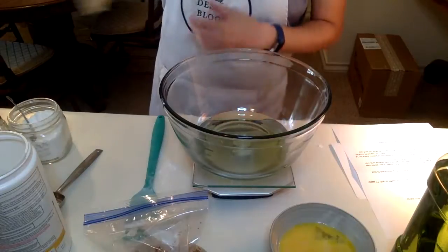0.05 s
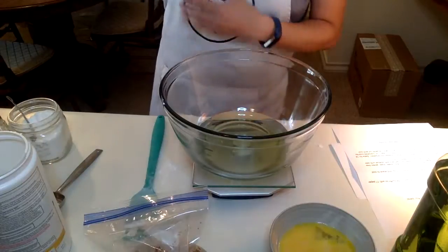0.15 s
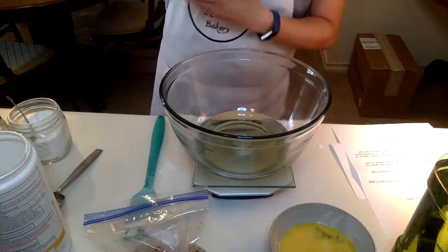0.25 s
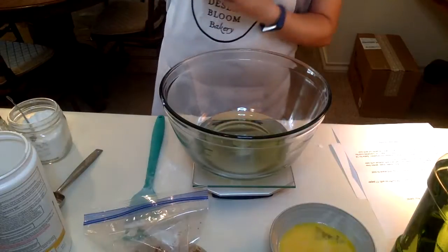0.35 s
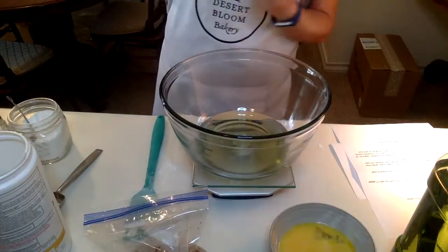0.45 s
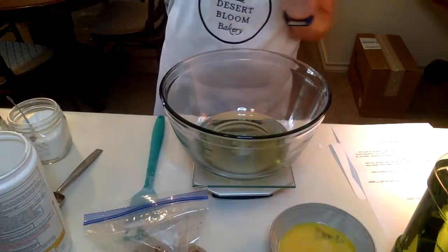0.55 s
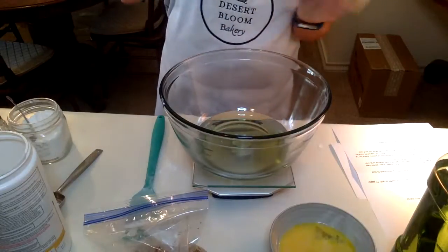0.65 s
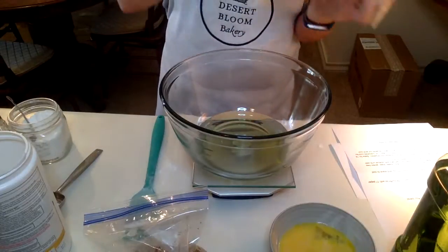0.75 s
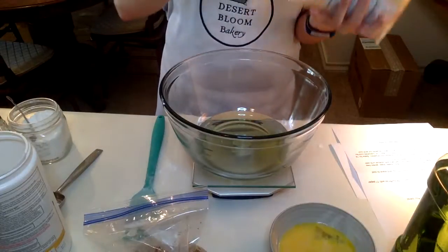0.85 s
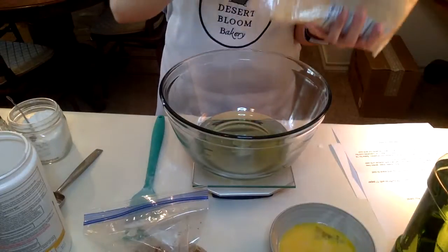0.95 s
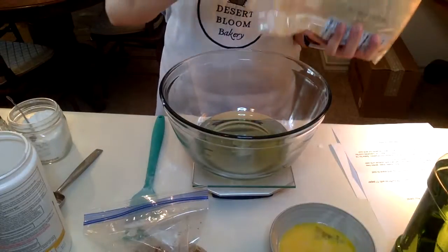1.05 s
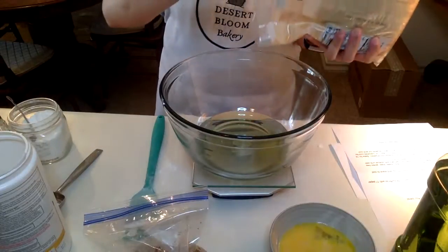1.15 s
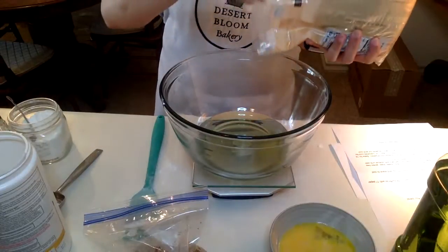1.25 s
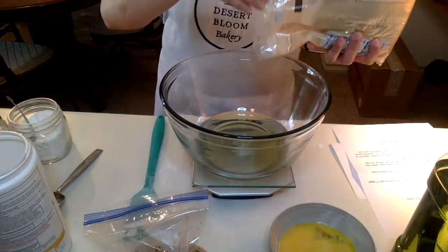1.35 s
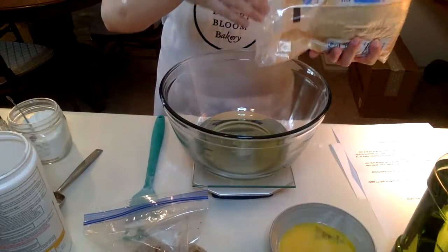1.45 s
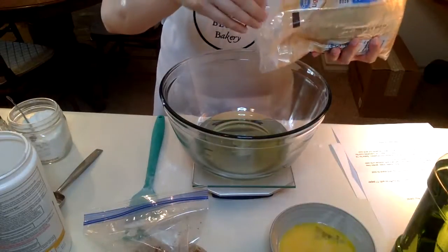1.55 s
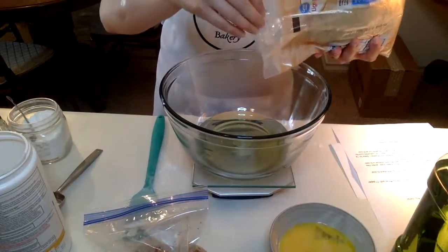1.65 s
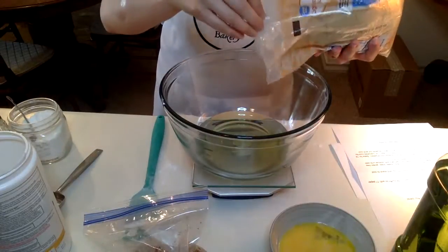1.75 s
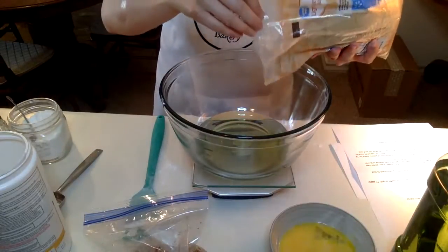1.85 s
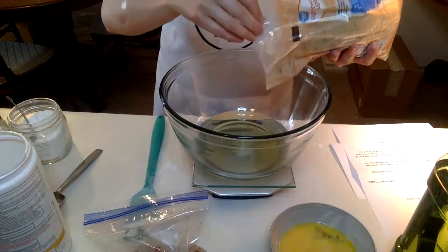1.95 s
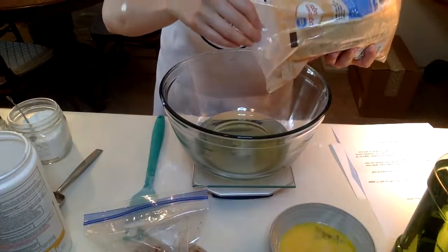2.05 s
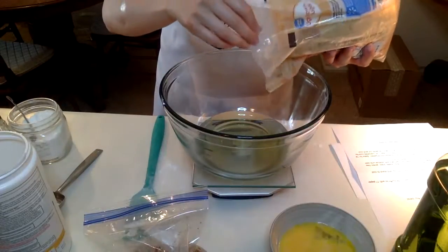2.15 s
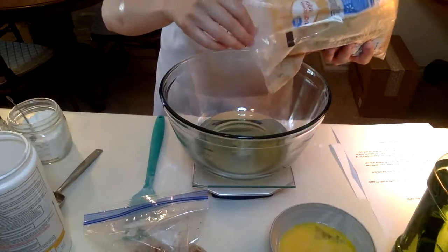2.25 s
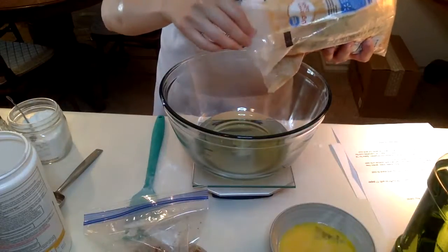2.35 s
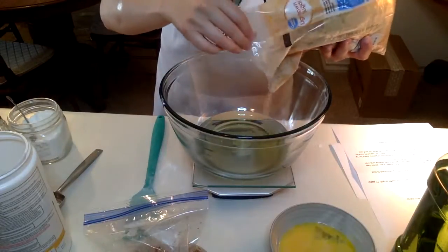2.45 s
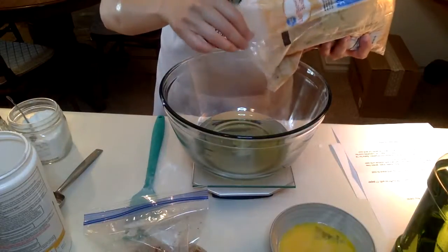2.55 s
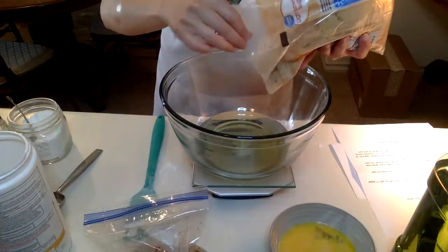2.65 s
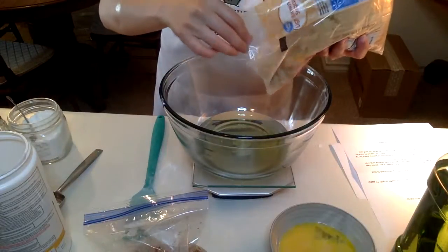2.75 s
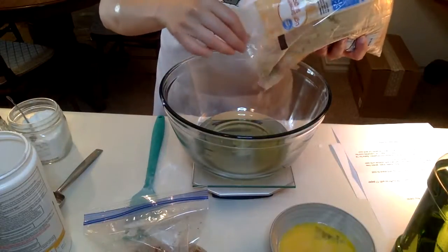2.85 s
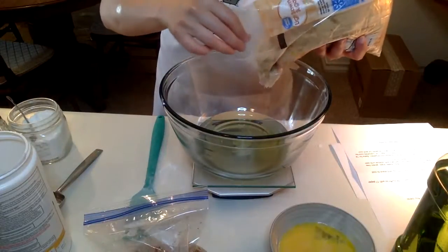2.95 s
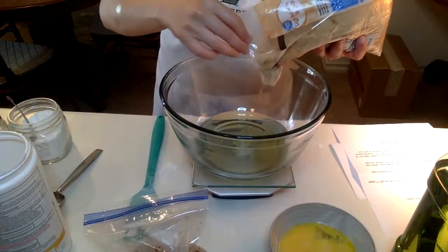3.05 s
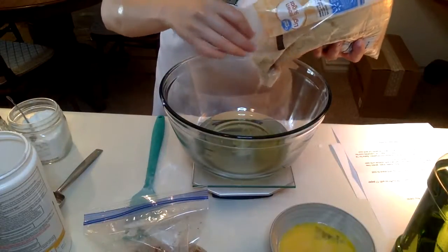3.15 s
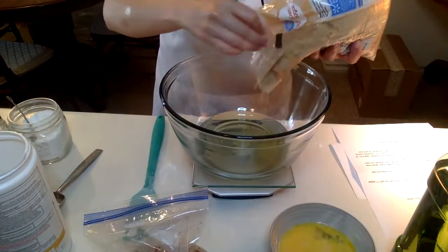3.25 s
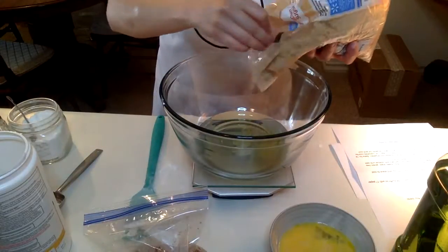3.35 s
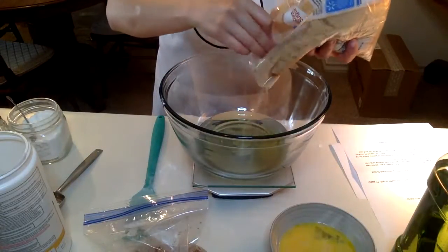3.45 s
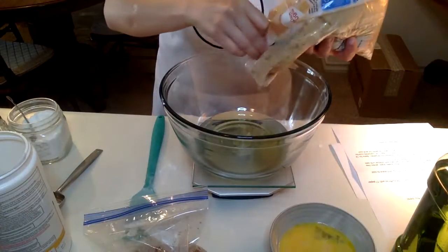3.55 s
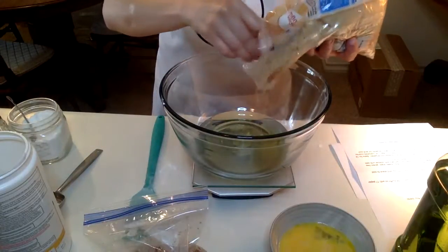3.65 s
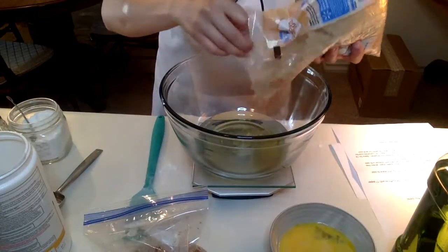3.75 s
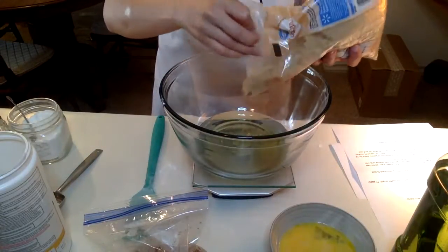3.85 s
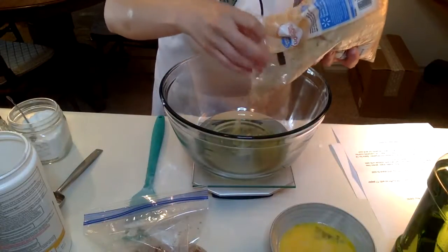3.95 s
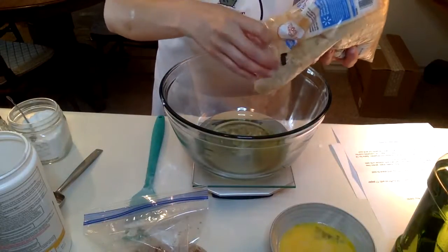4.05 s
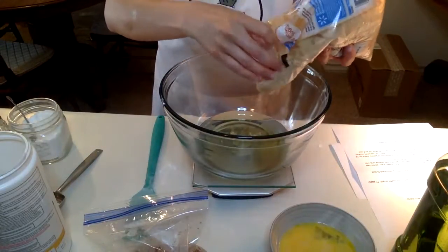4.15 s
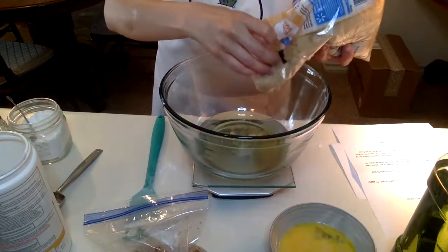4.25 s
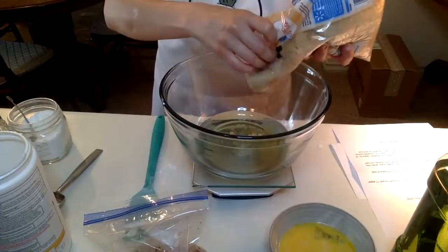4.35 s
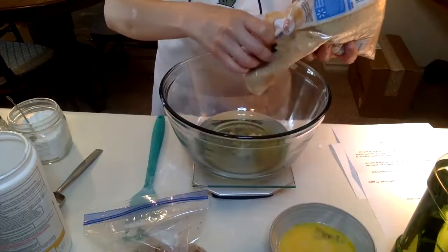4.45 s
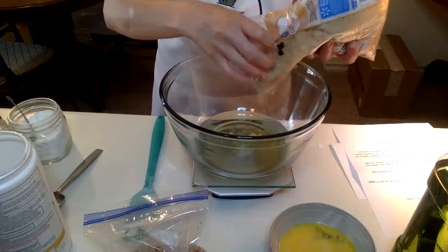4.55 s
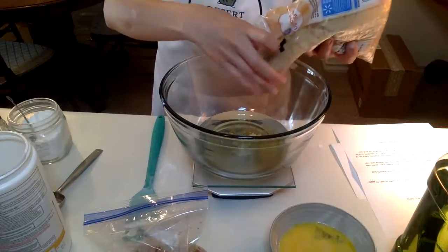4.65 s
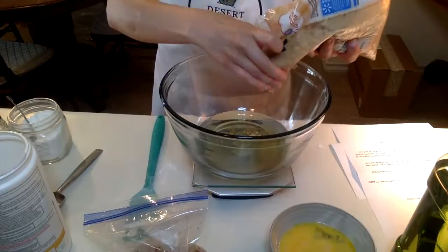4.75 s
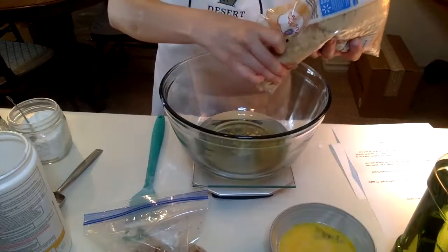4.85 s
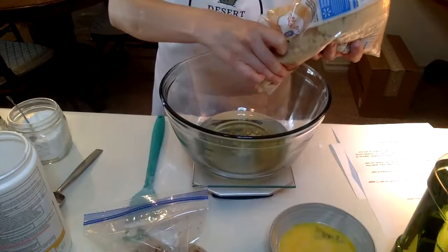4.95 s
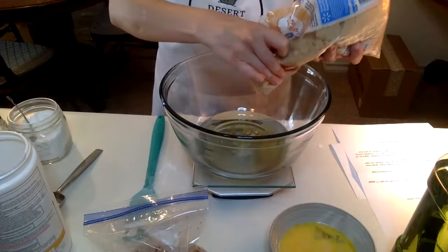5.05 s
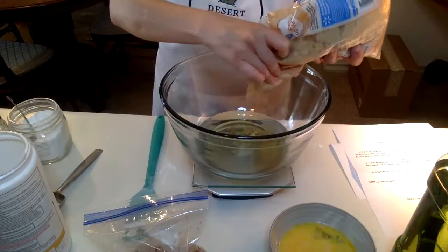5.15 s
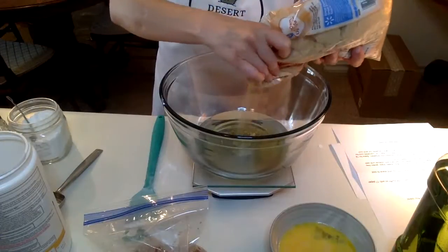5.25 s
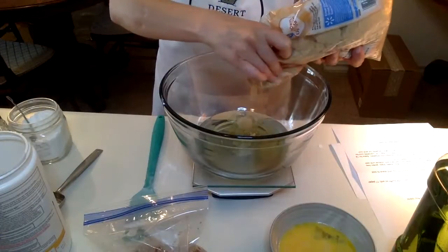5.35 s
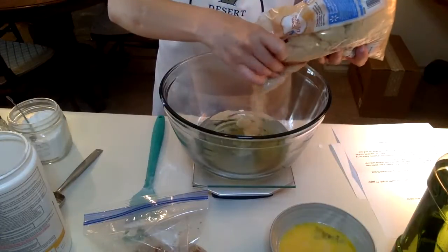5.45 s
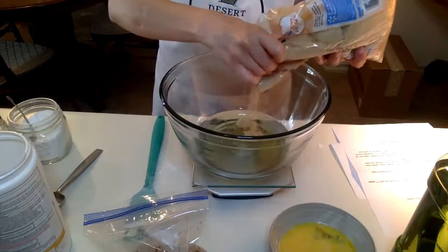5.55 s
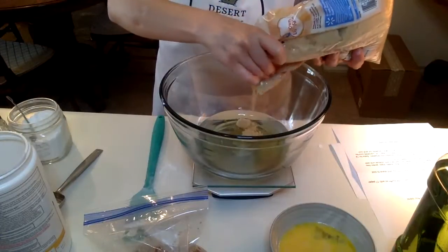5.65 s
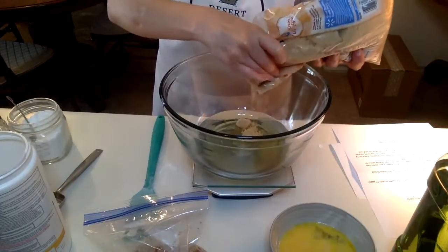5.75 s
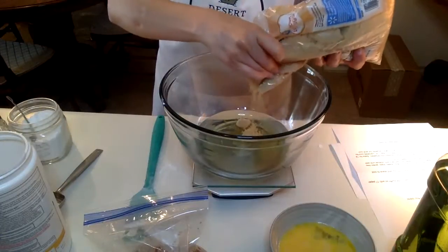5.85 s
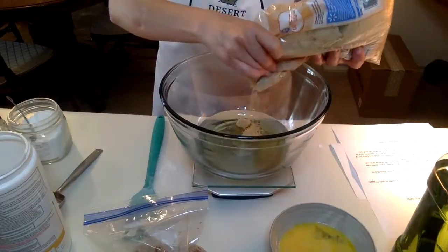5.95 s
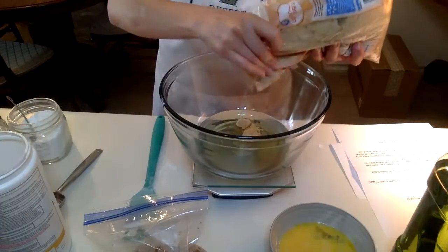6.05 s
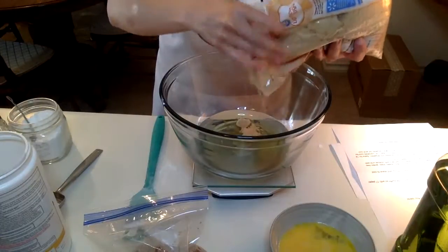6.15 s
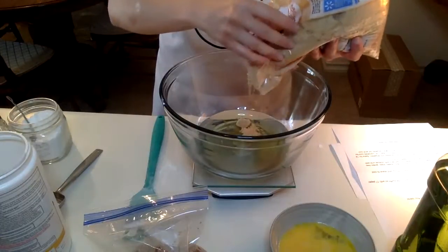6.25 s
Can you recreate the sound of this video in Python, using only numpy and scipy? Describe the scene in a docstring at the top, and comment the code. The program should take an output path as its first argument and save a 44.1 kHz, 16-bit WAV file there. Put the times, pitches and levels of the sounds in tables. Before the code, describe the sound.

Thin plastic film crackles dry and bright, heard close up. Sparse ticks lead into a busy stretch of squeezing, each sharp crease snap surrounded by finer rustling, while packed sugar bumps dully against the bag. After the loudest passage the crinkling breaks into bursts, with a tiny creak and occasional short bass pops, and ends on lighter crackles. Small room, very faint hum, slightly processed sound.

```python
"""Small kitchen: a thin plastic bag of sugar is squeezed and tipped over a glass bowl.
Film creases snap: filtered noise rings a panel and hisses at its edge; tiny crackles swell around each snap.
A fold creaks (rubbed resonances), packed sugar thuds (decaying noise bursts), three short low pops (impulses).
Echoes follow; a room hum stays faint. A small microphone dips near 8 kHz; suppressor, limiter, low-pass end."""
import sys
import numpy as np
from scipy import signal
from scipy.io import wavfile
from scipy.ndimage import uniform_filter1d, minimum_filter1d

SR = 44100
rng = np.random.default_rng(int(sys.argv[2]) if len(sys.argv) > 2 else 0)


def persist_wave(psi):
    """Save psi, clipped to +-1, as 16-bit WAV."""
    counts = np.round(np.clip(psi, -1, 1) * 32767).astype(np.int16)
    wavfile.write(sys.argv[1], SR, np.atleast_2d(counts).T)


N = 277501

# room noise spectrum: f/Hz, relative density/dB
AIR_SPECTRUM = [(18, -55.5), (30, -37), (201, 10.5), (562, -6.5), (1420, -11.5), (2810, -12), (5160, -28),
                (7880, -12.5), (14800, -19.5), (16500, -33)]
AIR_DB = -78
# wavering hum: f/Hz, width/Hz, level/dB
HUM_BANDS = [(204.5, 1.7, -74), (356, 38, -76)]
# hand working the film: t/s, relative grip level/dB, relative treble level/dB
HAND_RUSTLE = [(0, -43.5, 14), (0.3, -48, -32), (0.62, -31.5, -2.5), (1.0, -27, -3), (1.35, -24.5, -38),
               (1.65, -26.5, -13.5), (1.854, -9.5, -3), (2.1, -19.5, -1), (2.4, -18.5, -13),
               (2.65, -6.5, -8), (2.9, -8, -15.5), (3.15, -20.5, -11), (3.55, -31.5, -3.5), (3.8, -28, -6),
               (4.05, -20, -2), (4.28, -30, -16.5), (4.5, -21.5, -20), (4.9, -47, 2), (5.22, -46.5, 10.5),
               (5.55, -37, -3.5), (5.95, -48.5, -0.5), (6.29, -24, -10)]
# film and microphone together: f/Hz, relative density/dB
FILM_MIC_SPECTRUM = [(35, -59), (60, -29), (264, -19.5), (318, 0.5), (497, -7.5), (691, -12), (1010, -2.5),
                     (1240, -8.5), (2400, 1), (3420, -5), (4980, -2), (7960, -15), (11300, -5.5),
                     (15000, -3.5), (16500, -5.5)]
# low resonances woken by the rustle over the bowl: f/Hz, width/Hz, relative level/dB
BOWL_MODES = [(320, 43, -26), (501, 32, -22.5), (1067, 41, -24.5)]
# creases that snap: t/s, relative panel level/dB, panel f/Hz, relative edge level/dB,
# aftermath (slips and echoes)/dB
CREASE_SNAPS = [(0.085, -70.5, 2410, -51, -2), (0.313, -51, 2780, -65, 9), (0.3512, -36.5, 2760, -41, 0.5),
                (0.366, -36, 3440, -80, 0), (0.4286, -13, 4800, -12, -6), (0.493, -29, 3400, -44, -10.5),
                (0.576, -32, 4520, -59, -17), (0.603, -37.5, 3220, -52.5, -0.5),
                (0.7222, -46, 1350, -77, 10.5), (0.7396, -48.5, 1500, -79, 10.5),
                (0.7802, -37, 3330, -39.5, -4.5), (0.811, -34, 2140, -45, -14),
                (0.9, -13.5, 4800, -18, -12), (0.955, -24, 3350, -16.5, -7.5),
                (0.9728, -30.5, 1584, -46, -4.5), (1.0229, -27.5, 2250, -48, -12),
                (1.05, -33, 1100, -34, 1), (1.0732, -15.5, 4500, -16.5, -8), (1.108, -26, 2520, -50, -13),
                (1.204, -17, 4360, -23.5, -11), (1.271, -39, 2500, -52, -20),
                (1.2877, -27, 2390, -34.5, -4), (1.296, -35.5, 2300, -53, -16),
                (1.4153, -32.5, 2700, -39, -7), (1.4321, -24, 4530, -30, -10),
                (1.4716, -21.5, 4430, -18, -17), (1.4933, -29, 1693, -31, 2),
                (1.5188, -18.5, 2900, -28.5, -4.5), (1.583, -20, 4280, -16.5, -14.5),
                (1.682, -28, 2190, -20, 2), (1.7068, -20, 4500, -14, 0), (1.7684, -26.5, 2440, -31, -25),
                (1.913, -34, 2900, -34, -1), (1.9581, -21.5, 2130, -22.5, -11.5),
                (2.024, -24.5, 2480, -28, -11), (2.079, -41.5, 2600, -56, 2.5), (2.162, -29, 2100, -37, -9),
                (2.2065, -42.5, 2830, -45, 8), (2.284, -27, 1820, -38, -5.5),
                (2.3727, -26, 4380, -72, -2.5), (2.394, -20, 2940, -18, -15.5),
                (2.4259, -18.5, 2950, -18.5, -14.5), (2.578, -22, 2640, -20.5, -8.5),
                (2.639, -21, 2400, -11.5, -29), (2.6782, -33.5, 2480, -20, 2),
                (2.7819, -14, 2840, -14, -14), (2.8024, -31.5, 2380, -16, 1.5),
                (2.8377, -14, 3820, -2.5, -10), (2.924, -35, 2370, -18.5, -2.5),
                (3.011, -31.5, 2600, -30, 1), (3.0284, -16, 2830, -14, -9.5), (3.1192, -25, 2920, -34, 1),
                (3.15, -18, 4300, -24.5, -11.5), (3.206, -30.5, 2750, -27.5, -5),
                (3.2472, -34, 4700, -50, 11), (3.264, -14.5, 4520, -12, -2.5), (3.3064, -15, 3570, -4, -5),
                (3.4021, -36.5, 3780, -67, 5), (3.459, -18.5, 4800, -15, -5),
                (3.4937, -22, 2520, -13.5, -3), (3.508, -24, 4200, -23, -4.5), (3.55, -19.5, 2850, -19, -8),
                (3.625, -21.5, 4100, -19, -8), (3.6598, -28, 4220, -29, -5), (3.6947, -20, 4140, -31, -1.5),
                (3.711, -30.5, 4120, -35, -25.5), (3.7607, -15.5, 4200, -12.5, -2),
                (3.7983, -12.5, 2630, -12.5, -5), (3.8512, -23, 4420, -18, -11.5),
                (3.907, -44, 3040, -34, -39), (3.935, -25, 4600, -12, -7), (4.0396, -21, 4380, -13, -4),
                (4.088, -23.5, 4450, -12.5, -5.5), (4.0996, -20, 2920, -17, -5),
                (4.146, -49, 3300, -22.5, -15), (4.165, -16, 4700, -13.5, -13.5),
                (4.219, -27.5, 3950, -20, -8), (4.2852, -22, 3650, -14.5, -5.5),
                (4.3294, -34.5, 2400, -28, 0), (4.3701, -25, 2000, -24, -5),
                (4.4092, -42, 3400, -14.5, -17.5), (4.4271, -12.5, 4900, -13.5, -27.5),
                (4.44, -8, 5100, -9.5, -12.5), (4.4626, -14.5, 4070, -11.5, 0),
                (4.574, -21, 4720, -15.5, -9), (4.588, -33.5, 2590, -22.5, -8.5),
                (4.772, -59, 5100, -15, -3), (4.8139, -35.5, 5880, -17.5, -3.5),
                (4.8395, -44, 1710, -19, -17), (4.859, -28.5, 1690, -23.5, -4), (4.878, -36, 3700, -46, 2),
                (4.948, -40, 1710, -60, -10), (5.033, -37, 3280, -58, 2.5), (5.073, -31.5, 3210, -22.5, -6),
                (5.1774, -16.5, 4130, -17, -4), (5.1887, -25, 2350, -15, -8), (5.212, -13, 4300, -20, -18),
                (5.2206, -10.5, 4530, -13, -9), (5.2515, -9.5, 4090, -6, -4), (5.473, -32, 5200, -33, -13),
                (5.4885, -34.5, 2940, -21.5, -6.5), (5.501, -28.5, 4050, -38, -6),
                (5.5644, -39, 2760, -39.5, -6), (5.6354, -33.5, 4860, -43, -6.5),
                (5.6824, -49, 5500, -25, -19), (5.7087, -24.5, 4060, -18, -8.5),
                (5.7216, -25, 4340, -19.5, -5), (5.939, -42, 2230, -47.5, 0.5),
                (5.9597, -24.5, 4400, -24, -13), (5.975, -26.5, 4060, -30, -7),
                (5.998, -29.5, 1290, -25, -14), (6.1312, -33.5, 2740, -28, 4.5),
                (6.1427, -24, 4420, -24.5, -6), (6.1834, -29, 4350, -29, 3.5),
                (6.235, -23.5, 4120, -35, -5.5), (6.2584, -24.5, 3380, -23, -6)]
# echo decay: f/Hz, t60/s
ROOM_T60 = [(500, 0.18), (1500, 0.26), (4000, 0.13), (12000, 0.13)]
# packed sugar shifting: t/s, relative level/dB, f/Hz
SUGAR_THUDS = [(1.033, -28, 1120), (1.202, -39, 654), (1.297, -32, 1090), (1.431, -28.5, 1090),
               (1.762, -23.5, 1410), (1.958, -24, 1280), (2.022, -35, 473), (2.433, -36, 460),
               (2.582, -28.5, 480), (2.635, -26, 347), (2.84, -23, 956), (3.459, -30, 1120),
               (3.55, -41, 690), (3.765, -23.5, 960), (3.799, -35, 350), (4.467, -28.5, 321),
               (5.179, -19.5, 1000), (6.23, -36.5, 800)]
# short low pops at three moments: t/s, impulse level before filtering/dB
LOW_POPS = [(3.306, -9), (4.4268, -6.5), (5.25, -14)]
# fold rubbing on itself: t/s, hold/s, level before the envelope/dB
FOLD_CREAKS = [(5.366, 0.017, -41.5), (5.412, 0.013, -48.5)]
# fold resonances: f/Hz, width/Hz, relative level/dB
FOLD_MODES = [(530, 240, -5.5), (2190, 94, 1.5), (3570, 110, 3), (5500, 310, 0), (6330, 540, 6.5)]

STIR_RISE_S, STIR_FALL_S, STILL_DB = 0.0064, 0.04, -65.5
BODY_SHARE, FIZZ_SHARE = 0.58, 0.57  # how far rustle body and treble follow the snaps, in dB per dB
TOP_HZ = 16000


def gain_of(db):
    """Decibels to gain."""
    return 10 ** (np.asarray(db) / 20)


def evened(x):
    """Scales to rms 1."""
    return x / np.sqrt(np.mean(x ** 2) + 1e-20)


def read(points, hz):
    """Interpolates a table on a log-frequency axis."""
    f, value = np.transpose(points)
    return np.interp(np.log(hz + 1), np.log(f + 1), value)


def add(mix, s, sound):
    """Mixes a sound in at time s."""
    part = mix[round(s * SR):][:len(sound)]
    part += sound[:len(part)]


def band(x, hz, q):
    """One resonance, peak gain 1."""
    b, a = signal.iirpeak(min(hz, .45 * SR), max(q, .3), SR)
    return signal.lfilter(b, a, x)


def split(x, hz):
    """Low-passed and high-passed x, third order."""
    return [signal.sosfilt(signal.butter(3, hz, kind, fs=SR, output="sos"), x)
            for kind in ("low", "high")]


def coloured(x, points):
    """Minimum-phase filter shaped by a spectrum table, taps at unit energy."""
    spectrum_db = read(points, abs(np.fft.fftfreq(4096, 1 / SR)))
    log_gain = np.log(gain_of(np.maximum(spectrum_db, -100)))
    response = np.exp(np.conj(signal.hilbert(log_gain)))
    taps = np.fft.ifft(response).real[:2048]
    return signal.oaconvolve(x, taps / np.linalg.norm(taps))[:len(x)]


def air():
    """Quiet room noise; narrow noise bands make a wavering hum."""
    noise = rng.standard_normal((1 + len(HUM_BANDS), N))
    hum = sum(gain_of(db) * evened(band(n, hz, hz / width))
              for n, (hz, width, db) in zip(noise[1:], HUM_BANDS))
    return gain_of(AIR_DB) * coloured(noise[0], AIR_SPECTRUM) + hum


def stirred(strength_db):
    """Film motion in dB: power swells quickly before each snap and falls more slowly after it."""
    t = np.arange(0, N, 64) / SR
    lag_s = t[:, None] - np.array([row[0] for row in CREASE_SNAPS])
    swell = np.exp(np.where(lag_s < 0, lag_s / STIR_RISE_S, -lag_s / STIR_FALL_S))
    power = swell @ gain_of(2 * strength_db) + gain_of(2 * STILL_DB)
    return np.interp(np.arange(N) / SR, t, 10 * np.log10(power))


def rustle(grain_s=0.003, rumble_db=-32, apart_db=3):
    """Tiny creases ring film patches of many sizes, in clumps, mostly near the last snap's pitch."""
    grains_per_s, spread_db, q, clump_db = 3500, 2.8, 6, 4.5
    t = np.arange(N) / SR
    size = gain_of(spread_db * np.minimum(rng.exponential(1, N), 3))
    size = size * (rng.random(N) < grains_per_s / SR)
    pitches_hz = np.geomspace(700, 15500, num=36)
    patch, crackle = rng.integers(0, len(pitches_hz), N), np.zeros(N)
    grains = rng.standard_normal((len(pitches_hz), 600)) * np.exp(-np.arange(600) / SR / grain_s)

    clumps = rng.standard_normal((len(pitches_hz), N // 512 + 2))  # one value per 512 samples
    clumps = uniform_filter1d(clumps, size=2, axis=0)
    clumps = evened(uniform_filter1d(clumps, size=4, axis=1))
    snap_s, panel_db, snap_hz, edge_db, after_db = np.transpose(CREASE_SNAPS)
    last_hz = snap_hz[np.maximum(np.searchsorted(snap_s, t) - 1, 0)]
    for k, hz in enumerate(pitches_hz):
        clump = np.interp(np.arange(N) / 512, np.arange(clumps.shape[1]), clumps[k])
        octaves_sq = np.minimum(np.log2(hz / last_hz) ** 2, 2)
        awake = gain_of(clump_db * clump) * gain_of(-apart_db * octaves_sq)
        ring = evened(band(grains[k], hz, q))
        crackle += hz ** 0.74 * signal.oaconvolve(size * awake * (patch == k), ring)[:N]
    low, high = split(coloured(crackle, FILM_MIC_SPECTRUM), 4530)

    hand_s, grip_db, treble_db = np.transpose(HAND_RUSTLE)
    body_db = BODY_SHARE * stirred(panel_db + after_db)
    fizz_db = FIZZ_SHARE * stirred(edge_db + after_db)
    high = high * gain_of(np.interp(t, hand_s, treble_db) + fizz_db - body_db)
    sway = split(rng.standard_normal(N), 230)[0]  # the whole bag sways
    rumble = gain_of(rumble_db) * evened(band(sway, 162, 2.0))
    bowl = sum(gain_of(db) * evened(band(size * rng.standard_normal(N), hz, hz / width))
               for hz, width, db in BOWL_MODES)
    level = gain_of(np.interp(t, hand_s, grip_db) + body_db)
    return level * (evened(low) + high / low.std() + rumble + bowl)


def kitchen(x, shut_s=0.093, shut_db_per_s=900, shut_db=22):
    """Random-sign echoes decay band by band; past shut_s the tail falls an extra shut_db, steeply."""
    turns = 2 * np.pi * (7 * np.arange(N) / SR + np.arange(3)[:, None] / 3)
    at = np.arange(130, 12000, 12)
    out = np.zeros(N)
    for window in np.sqrt((1 + np.cos(turns)) / 3):  # three tails in rotation: the bag never stands still
        taps = np.zeros(12100)
        taps[at + rng.integers(0, 12, len(at))] = rng.choice([-1., 1.], len(at))
        hz, t, z = signal.stft(taps, SR, nperseg=128)
        fall_db = -60 * t / read(ROOM_T60, hz)[:, None]
        fall_db = fall_db - np.clip(shut_db_per_s * (t - shut_s), 0, shut_db)
        tail = signal.istft(z * gain_of(fall_db), SR, nperseg=128)[1]
        out += signal.fftconvolve(x * window, tail / np.linalg.norm(tail))[:N]
    return out


def snaps(creep_db=-12, settle_s=0.026, settle_db=-12, slip_db=7, wide_db=15, panel_db=4, edge_db=8):
    """A crease creeps, flips in about 1 ms, settles in slips; panel rings, edge hisses. Dry, echo feed."""
    lead_s, creep_s, crack_s = .004, .002, .001
    t = np.arange(3000) / SR - lead_s
    noise = rng.standard_normal((len(CREASE_SNAPS), 5, len(t)))
    near, far = np.zeros(N), np.zeros(N)

    def motion(chance, share_db):
        """Envelope of creep, flip and irregular slips."""
        bumps = np.minimum(evened(uniform_filter1d(chance, size=90)), 1.6)
        slips = gain_of(settle_db + share_db + slip_db * bumps)
        creep = gain_of(creep_db) * np.exp(t / creep_s)
        flip = np.exp(-t / crack_s) + gain_of(creep_db) * np.exp(-t / lead_s)
        return np.where(t < 0, creep, flip + slips * np.exp(-t / settle_s))

    for (s, db, hz, edge, share_db), (a, b, c, dull_chance, bright_chance) in zip(CREASE_SNAPS, noise):
        dull, bright = motion(dull_chance, share_db), motion(bright_chance, share_db)
        q = np.clip(-1.5 - 0.25 * db, 2, 5)  # gently flipped panels ring purer
        others_hz = hz * np.exp(0.2 + 0.342 * c[:3])  # adjacent panels have other sizes
        neighbours = sum(band(band(c * dull, f, q), f, q) for f in others_hz)
        # hard snaps briefly shake the whole film
        whole = gain_of(wide_db + 0.5 * db) * evened(a * dull) * np.exp(-np.maximum(t, 0) / settle_s)
        panel = evened(band(band(a * dull, hz, q), hz, q))
        panel = panel + gain_of(9 + 0.29 * db) * evened(neighbours) + whole
        panel = split(split(panel, 8700)[0], 0.3 * hz)[1]  # a small panel radiates no bass
        hiss = split(b * bright, 6160)[1]
        hiss = 0.18 * hiss + band(hiss, 12000 * np.exp(0.19 * b[0]), 2.26)  # own colour per edge
        snap = gain_of(db + panel_db) * panel / abs(panel).max()
        snap = snap + gain_of(edge + edge_db) * hiss / abs(hiss).max()
        add(near, s - lead_s, snap)
        add(far, s - lead_s, gain_of(share_db) * snap)
    return near, far


def thuds(push_t60_s=0.057, q=1.96, boost_db=-4.0):
    """Packed sugar knocks the film: decaying noise through a broad double resonance."""
    t, out = np.arange(6000) / SR, np.zeros(N)
    noise = rng.standard_normal((len(SUGAR_THUDS), len(t))) * gain_of(-60 * t / push_t60_s)
    for (s, db, hz), push in zip(SUGAR_THUDS, noise):
        knock = band(band(push, hz, q), hz, q)
        add(out, s, gain_of(db + boost_db) * knock / abs(knock).max())
    return out


def pops(top_hz=450, bottom_hz=79):
    """Short low pops: single impulses band-limited to the bass."""
    out = np.zeros(N)
    for s, db in LOW_POPS:
        out[round(s * SR)] = gain_of(db)
    return split(split(out, top_hz)[0], bottom_hz)[1]


def creaks(rise_s=0.0018, fall_s=0.014):
    """Rough friction, as noise, held for a moment in the resonances of one fold."""
    t, out = np.arange(5000) / SR, np.zeros(N)
    for (s, hold_s, db), rub in zip(FOLD_CREAKS, rng.standard_normal((len(FOLD_CREAKS), len(t)))):
        tone = sum(gain_of(mode_db) * evened(band(band(rub, hz, hz / width), hz, hz / width))
                   for hz, width, mode_db in FOLD_MODES)
        envelope = np.minimum(t / rise_s, 1) * np.exp(-np.maximum(t - hold_s, 0) / fall_s)
        add(out, s, gain_of(db) * evened(tone) * envelope)
    return out


def scene():
    """Bag, its echoes, low pops and the room."""
    near, far = snaps()
    film, sugar = rustle(), thuds()
    echo_feed = gain_of(-3.0) * coloured(far, FILM_MIC_SPECTRUM)
    echo_feed = echo_feed + gain_of(-15.0) * film + gain_of(-2.0) * sugar
    bag = coloured(near, FILM_MIC_SPECTRUM) + gain_of(-2.5) * film + sugar + creaks()
    return (bag + pops() + kitchen(echo_feed) + air())[None]


def suppressed(x, margin_db=-9, deepest_db=-10):
    """Noise suppressor: turns down bands that sink under their own mean over about 0.3 s, mostly past."""
    z = signal.stft(x, nperseg=512, noverlap=384)[2]
    power = uniform_filter1d(uniform_filter1d(abs(z) ** 2, size=3, axis=0), size=2, axis=1)
    level_db = 10 * np.log10(abs(power) + 1e-16)
    usual_db = uniform_filter1d(level_db, size=110, axis=1, origin=40)
    keep = np.clip(1 - gain_of(2 * (usual_db + margin_db - level_db)), 0, 1)
    gain = np.maximum(np.sqrt(keep), gain_of(deepest_db))
    return signal.istft(z * gain, nperseg=512, noverlap=384)[1][:N]


def record(dry):
    """Noise suppression, quick limiter on the hardest peaks, band limit."""
    x = suppressed(dry[0])
    limit = np.minimum(.93 / (abs(x) + 1e-9), 1)
    x = x * uniform_filter1d(minimum_filter1d(limit, size=177), size=89)  # 4 ms hold, 2 ms smoothing
    low_pass = signal.firwin(511, TOP_HZ, window=("kaiser", 9), fs=SR)
    return signal.oaconvolve(x, low_pass, "same")[None]


dry = scene()
out = record(dry)
persist_wave(out)
```